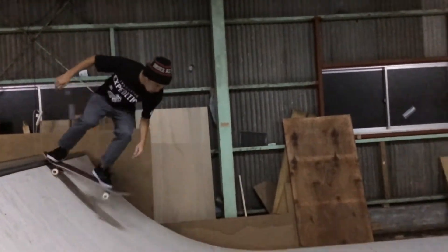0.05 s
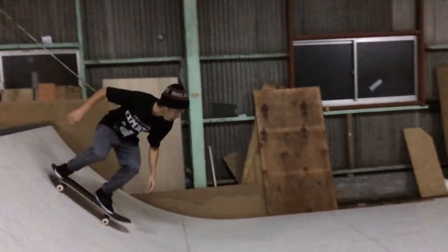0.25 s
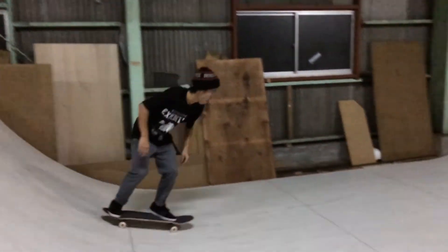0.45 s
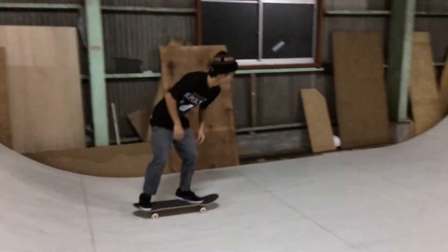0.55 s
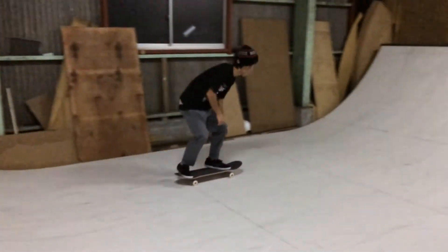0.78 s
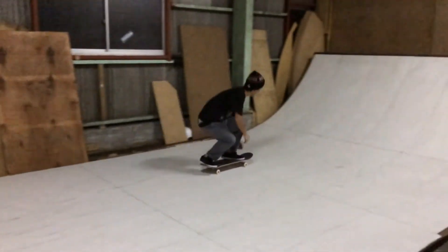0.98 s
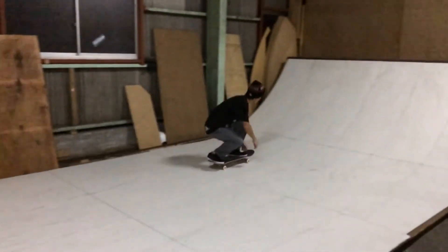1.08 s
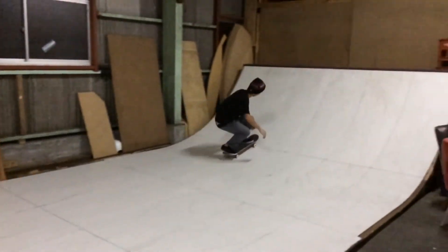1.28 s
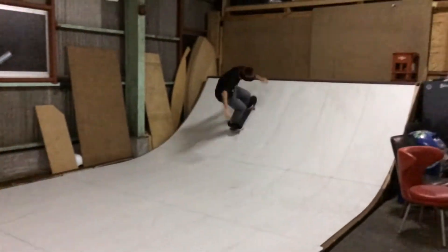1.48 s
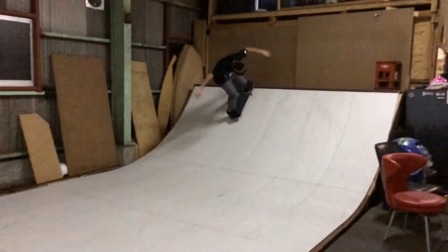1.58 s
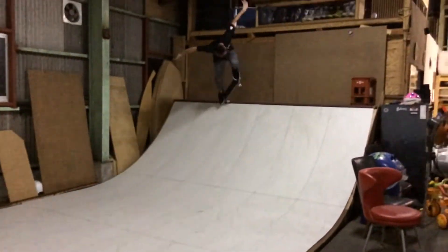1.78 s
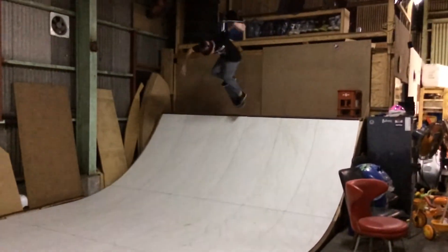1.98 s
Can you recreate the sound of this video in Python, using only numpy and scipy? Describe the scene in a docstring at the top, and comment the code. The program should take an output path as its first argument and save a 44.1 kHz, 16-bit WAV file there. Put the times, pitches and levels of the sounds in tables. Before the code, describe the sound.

A skateboard slaps down on a wooden ramp and rolls across with a hollow rumble.

```python
"""Skateboard on a mini ramp

A skateboard drops in on a plywood ramp in a large shed. The front wheels slap down, and the hollow
ramp rumbles under the rolling wheels and thuds as it takes the rider's weight. The wheels hiss and
tick over seams and grit, climb the far wall and leave the top with a clack. The shed rings on."""
import sys
import numpy as np
from scipy import signal
from scipy.fft import rfft, irfft, next_fast_len
from scipy.io import wavfile
from scipy.ndimage import uniform_filter1d

SR = 44100
rng = np.random.default_rng(int(sys.argv[2]) if len(sys.argv) > 2 else 0)


def transcribe(u):
    """Save the signal u as a 16-bit wav file named by the first command-line argument.

    u: samples, shape (n,) or (channels, n), limited to [-1, 1]; the rate is SR.
    q: integer samples, one column per channel.
    """
    v = np.clip(np.atleast_2d(u).T, -1, 1)
    q = np.round(v * 32767).astype(np.int16)
    wavfile.write(sys.argv[1], SR, q)


N = 90404
T = np.arange(N) / SR


def from_db(db):
    """Turn decibels into a number to multiply by."""
    return 10 ** (np.asarray(db) / 20)


def rms_one(x):
    """Scale a sound so its average power is 1."""
    return x / np.sqrt(np.mean(x ** 2) + 1e-20)


def level(rows):
    """Draw a volume curve through (seconds, dB) points."""
    return from_db(np.interp(T, *np.transpose(rows)))


def at_hz(points, hz):
    """Look up a frequency in a table, with octaves evenly spaced."""
    freqs, values = np.transpose(points)
    return np.interp(np.log(hz), np.log(freqs), values)


def colour(x, points):
    """Shape a sound's tone with (Hz, dB) points. Only the differences between the dB values count."""
    size = 2 * next_fast_len(N)
    hz = np.maximum(np.fft.rfftfreq(size, 1 / SR), 10)
    gain = rms_one(from_db(at_hz(points, hz)))
    # fold the filter so it rings only after a hit, never before
    cepstrum = irfft(np.log(gain + 1e-9))
    cepstrum[1:size // 2] *= 2
    cepstrum[size // 2 + 1:] = 0
    return irfft(rfft(x, size) * np.exp(rfft(cepstrum)))[:N]


def dying(start, t60):
    """Jump to 1, then fade by 60 dB in t60 seconds (the fade time)."""
    return (T >= start) * np.exp(-np.log(1000) * np.maximum(T - start, 0) / t60)


def ring(start, hz, t60):
    """One struck note that fades away."""
    return np.sin(2 * np.pi * hz * (T - start)) * dying(start, t60)


def burst(start, t60):
    """A short rattle of hard contact."""
    return rng.choice([-1, 1], N) * dying(start, t60)


def resonate(x, hz, q):
    """Make a sound ring near one pitch, at power 1. A higher q rings longer."""
    peak = signal.iirpeak(hz, q, fs=SR)
    once = signal.lfilter(*peak, x + 1e-18)
    return rms_one(signal.lfilter(*peak, once + 1e-18))


def steady(x, span_s):
    """Even out the level over each short span, as under a steady load."""
    return x / np.sqrt(uniform_filter1d(x ** 2, int(span_s * SR)) + 1e-9)


BUMPS_PER_S, GRIT_PER_S = 900, 5300
def grains(per_s, spread_db=1.5):
    """A rough surface gives tiny random knocks of uneven size."""
    sizes = from_db(spread_db * np.minimum(rng.exponential(1, N), 4))
    signs = rng.choice([-1, 1], N)
    return rms_one(sizes * signs * (rng.random(N) < per_s / SR))


# The background's tone. Each row: frequency in Hz, relative level in dB.
WASH_TONE = [(18, -13), (30, 18), (81, -5.5), (140, 11.5), (256, -5), (443, 0), (1080, -12), (1510, -5.5),
             (1720, -2.5), (1910, -7), (2420, -12), (2620, -12.5), (3490, -13.5), (3880, -15.5),
             (5450, -25.5), (8720, -28), (15500, -51.5)]
def shed_wash():
    """A quiet, steady wash of noise fills the shed."""
    return from_db(-40) * rms_one(colour(rng.standard_normal(N), WASH_TONE))


# How long the shed rings. Each row: frequency in Hz, fade time in seconds.
SHED_FADES = [(100,0.23),(1000,0.88),(4000,0.52),(14000,0.15)]
def shed_response():
    """The shed answers a click with a cluster of wall echoes and a tail whose middle pitches last longest."""
    edges = np.geomspace(40, 18000, 10)
    tail = 0
    for low, high in zip(edges, edges[1:]):
        bandpass = signal.butter(2, [low, high], "band", fs=SR, output="sos")
        band = signal.sosfilt(bandpass, rng.standard_normal(N))
        tail = tail + band * dying(0.0065, at_hz(SHED_FADES, np.sqrt(low * high)))
    walls = from_db(-2.5) * rms_one(burst(start=0.023, t60=0.15))
    return rms_one(rms_one(tail) + walls) / np.sqrt(N)


def in_shed(x, shed, room_db):
    """A sound plus its echoes in the shed."""
    return x + from_db(room_db) * signal.fftconvolve(x, shed)[:N]


# Knocks at take-off. Each row: start in seconds, level in dB.
CLACK_HITS = [(1.8321,-28.5),(1.838,-29)]
# Their tone. Each row: frequency in Hz, relative level in dB.
CLACK_TONE = [(300,-13),(900,-6.5),(1550,6.5),(2300,-0.5),(3000,-3),(3700,-4.5),(5200,-12.5),(6300,-16),(9000,-17.5),(13000,-25),(16000,-28)]
def takeoff_clack(shed):
    """Far away, the deck and its metal axles knock as the board leaves the top edge."""
    knocks = sum(from_db(db) * burst(start, t60=0.059) for start, db in CLACK_HITS)
    return in_shed(colour(knocks, CLACK_TONE), shed, room_db=-4.5)


# Seams and grit. Each row: start in seconds, level in dB, ring pitch in Hz, ring in dB above the click.
TICK_HITS = [(0.3228,-32,13100,-14),(0.4977,-30,3800,-23),(0.504,-35.5,6300,-12),(0.5696,-27,1620,-5),(.574,-39,6200,-11),(.697,-31,1460,6),(0.7516,-28,7800,-15),(.776,-34.5,1470,6.5),(0.8044,-29.5,1480,10),(.833,-41,6250,-15),(0.8885,-32,8600,-20),(.894,-33,1650,2),(1.073,-45,5770,4.5),(1.159,-29,2640,-3),(1.3996,-28,4300,-2),(1.4676,-29.5,3520,2),(1.498,-32,5200,-7),(1.729,-39,6250,-6),(1.932,-39.5,8400,-11)]
# The clicks' tone. Each row: frequency in Hz, relative level in dB.
TICK_TONE = [(400,-26),(1000,-9),(1500,17),(2100,15),(3600,2),(5200,0.5),(6500,-6),(9000,-4),(13000,-4),(16000,-23)]
def wheel_ticks(shed):
    """Each small, sharp contact makes a wheel, an axle or the deck ring briefly."""
    clicks = rings = 0
    for start, db, hz, ring_db in TICK_HITS:
        click = from_db(db) * burst(start, t60=0.019)
        clicks = clicks + click
        rings = rings + from_db(ring_db) * click.std() * resonate(click, hz, q=3.2)
    return in_shed(colour(clicks, TICK_TONE) + rings, shed, room_db=-9)


# The scrub's tone. Each row: frequency in Hz, relative level in dB.
SCRUB_TONE = [(1500,-26),(2500,-4),(3600,-8),(4700,3.5),(5600,-3),(6400,-8),(8000,-11),(13000,-16),(16000,-28)]
def wheel_scrub():
    """The wheels rub as they carve up the far wall, swelling and then fading."""
    peak_s, peak_db, rise_db_per_s, fall_db_per_s = 1.466, -43.5, 85, 60
    below_peak_db = np.maximum(rise_db_per_s * (peak_s - T), fall_db_per_s * (T - peak_s))
    return colour(grains(GRIT_PER_S), SCRUB_TONE) * from_db(peak_db - below_peak_db)


# How loud the wheels whirr and hiss. Each row: time in seconds, level in dB.
WHIRR_LEVELS = [(0,-43),(.21,-49.5),(.26,-40),(.4,-38),(.57,-41),(.8,-41),(1.02,-40),(1.25,-39.5),(1.5,-38),(1.65,-38),(1.78,-40),(2.05,-41.5)]
HISS_LEVELS = [(0,-50),(.21,-55),(.26,-44),(.4,-45.5),(.56,-41),(.7,-48.5),(.85,-46),(1.02,-51.5),(1.18,-45),(1.3,-47.5),(1.48,-40),(1.62,-46),(1.76,-55),(2.05,-48.5)]
# Their tones. Each row: frequency in Hz, relative level in dB.
WHIRR_TONE = [(500,-21.5),(800,-2.5),(940,-1.5),(1150,-4.5),(1380,-1.5),(1600,-5.5),(2000,-15.5),(2700,-13),(4000,-31.5)]
HISS_TONE = [(1000,-22.5),(1900,4.5),(2500,3.5),(3000,4.5),(3700,2),(4500,-3.5),(5400,-9),(6300,-7.5),(7300,-14.5),(8400,-18.5),(10000,-17),(13200,-35),(15500,-25)]
def wheels_on_grit():
    """Fine grit under the wheels makes a mid-pitched whirr and a high hiss."""
    whirr = colour(grains(GRIT_PER_S), WHIRR_TONE) * level(WHIRR_LEVELS)
    hiss = colour(grains(GRIT_PER_S), HISS_TONE) * level(HISS_LEVELS)
    return whirr + hiss


# How loud the plywood roars. Each row: time in seconds, level in dB.
ROAR_LEVELS = [(0,-45.5),(.212,-49.5),(.235,-22.5),(.33,-24.5),(.41,-26.5),(.52,-22.5),(.6,-20),(.72,-21),(.88,-25.5),(1.02,-29),(1.16,-24),(1.29,-27.5),(1.47,-21),(1.58,-26),(1.7,-30.5),(2.05,-33.5)]
# The plywood's broad tone, then its own notes. Each row: frequency in Hz, relative level in dB.
ROAR_TONE = [(120,-24.5),(220,-2.5),(295,2.5),(355,0),(435,2.5),(490,2),(555,-0.5),(650,-2.5),(750,-3.5),(850,-13.5),(950,-14),(1200,-19.5),(2000,-58),(4000,-62.5)]
SKIN_NOTES = [(230, -9.5), (298, -14), (432, -11), (553, -11), (764, -21.5), (939, -26)]
def plywood_roar():
    """Bumps under the wheels shake the plywood skin and keep its notes ringing."""
    shaking = colour(grains(BUMPS_PER_S), ROAR_TONE)
    bumps = grains(BUMPS_PER_S)
    notes = sum(from_db(db) * resonate(bumps, hz, q=15.4) for hz, db in SKIN_NOTES)
    return steady(shaking + notes, span_s=0.11) * level(ROAR_LEVELS)


# How the ramp's boom rises and falls. Each row: time in seconds, relative level in dB.
BOOM_LEVELS = [(0,-46),(.14,-62),(.212,-34.5),(.24,-17),(.3,-21.5),(.41,-21.5),(.45,-22.5),(.5,-19),(.56,-20.5),(.7,-18),(.82,-18.5),(.97,-24),(1.18,-24),(1.38,-24.5),(1.43,-32),(1.52,-19.5),(1.68,-30.5),(2.05,-41)]
# The frame's tone. Each row: frequency in Hz, relative level in dB.
FRAME_TONE = [(20,-37.5),(48,-17.5),(68,-16),(105,-7.5),(130,-6),(160,-3),(182,-2.5),(205,-3.5),(232,-6.5),(290,-15.5),(420,-38),(900,-67)]
def ramp_boom():
    """Bumps shake the ramp's frame, and the hollow beneath sings at one pitch."""
    hollow = steady(resonate(grains(BUMPS_PER_S), hz=158.1, q=6.2), span_s=0.066)
    frame = steady(colour(grains(BUMPS_PER_S), FRAME_TONE), span_s=0.038)
    return (from_db(0.5) * frame + from_db(-3.5) * hollow) * level(BOOM_LEVELS)


def rolling(shed, turns_per_s=26, throb_db=1):
    """All the rolling sounds throb together as the wheels turn."""
    throb = from_db(throb_db * np.sin(2 * np.pi * (turns_per_s * T + rng.random())))
    ramp = ramp_boom() + plywood_roar()
    wheels = wheels_on_grit() + wheel_scrub()
    return ramp * throb + in_shed(wheels * throb, shed, room_db=-10.5)


# The ramp takes the rider's weight. Each row: start in seconds, level in dB, panel pitch in Hz.
THUD_HITS = [(0.255,-7,101),(.283,-9.5,55.5),(0.301,-7.5,100),(.395,-3.5,164.7),(0.427,-9,110.3),(.492,-8,160),(.695,-11.5,152),(.76,-3,103.5),(0.881,-10,99),(0.913,-16,83),(1.251,-18,98),(1.409,-6,127),(1.469,-12.5,117),(1.768,-24,126),(1.844,-21,103),(1.955,-30,102)]
def weight_thuds(rise_s=0.01):
    """A loaded panel swells into its lowest note and rocks the frame beneath."""
    thuds = 0
    for start, db, hz in THUD_HITS:
        panel = ring(start, hz, t60=0.16)
        frame = from_db(-17) * ring(start, hz=49, t60=0.28)
        swell = np.clip((T - start) / rise_s, 0, 1)
        thuds = thuds + from_db(db) * (panel + frame) * swell
    return thuds


def plywood_snap(start, spread_s=0.002):
    """Plywood spreads a sharp blow into a quick downward sweep: the treble arrives first."""
    t = np.clip(T - start, 0, spread_s)
    sweep = np.cos(np.pi * SR * t * (1 - t / (2 * spread_s)))
    return sweep * (T >= start) * (t < spread_s)


# The struck ramp's notes. Each row: pitch in Hz, relative level in dB, fade time in seconds.
RAMP_NOTES = [(50.8,-11,0.2),(81,-34,.2),(102,-32,0.1),(155.4,2,0.1),(178,-26,0.083),(282,-6.5,0.086),(412,-7,0.051),(590,-5.5,0.034),(955,-23.5,0.19),(997,-16.5,0.067),(1273,-29,0.067)]
# The tones of the crack and its echo. Each row: frequency in Hz, relative level in dB.
CRACK_TONE = [(300,-18),(1000,-13),(1700,-10),(2100,1),(2500,7.5),(3200,-1.5),(3850,6.5),(4600,-3),(5200,-24),(6200,0.5),(7200,-19),(8200,-11),(10000,-19.5),(12500,-14),(16000,-19)]
ECHO_TONE = [(400,0.5),(1000,12),(1400,8),(1900,0),(2600,1.5),(4000,-7.5),(5200,-10),(6300,-11),(7500,-16.5),(13000,-20),(16000,-46)]
def wheel_slap(shed, start=0.2217, flex_lag_s=0.0012, echo_rise_s=0.037):
    """The hard front wheels crack down on the plywood, the whole ramp rings and the walls answer."""
    notes = sum(from_db(db) * ring(start + flex_lag_s, hz, t60) for hz, db, t60 in RAMP_NOTES)
    blow = in_shed(from_db(-2.5) * notes, shed, room_db=-8.5)
    snap = from_db(-3) * plywood_snap(start)
    rattle = from_db(-6.5) * burst(start, t60=0.016)
    crack = from_db(-8) * colour(snap + rattle, CRACK_TONE)
    swell = np.clip((T - start) / echo_rise_s, 0, 1) ** .5 * dying(start, t60=0.21)
    echo = from_db(-26) * colour(rng.standard_normal(N) * swell / swell.max(), ECHO_TONE)
    return blow + crack + echo


def scene():
    """Add the ride to the shed's background noise, in one channel."""
    shed = shed_response()
    wash = shed_wash()
    ride = rolling(shed) + wheel_slap(shed) + weight_thuds() + wheel_ticks(shed) + takeoff_clack(shed)
    return (wash + ride)[None]


def record(dry, low_cut_hz=48, high_cut_hz=15150):
    """The microphone loses the deepest bass, the tallest peaks are rounded and the top treble is cut."""
    trimmed = signal.sosfilt(signal.butter(2, low_cut_hz, "high", fs=SR, output="sos"), dry)
    rounded = trimmed / (1 + trimmed ** 6) ** (1 / 6)
    return signal.sosfilt(signal.ellip(11, .1, 90, high_cut_hz, fs=SR, output="sos"), rounded)


dry = scene()
out = record(dry)
transcribe(out)
```